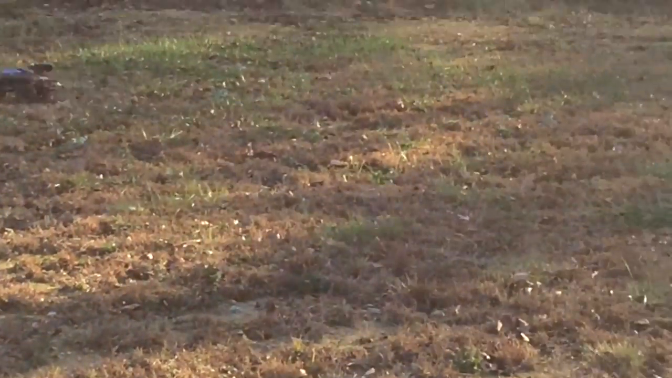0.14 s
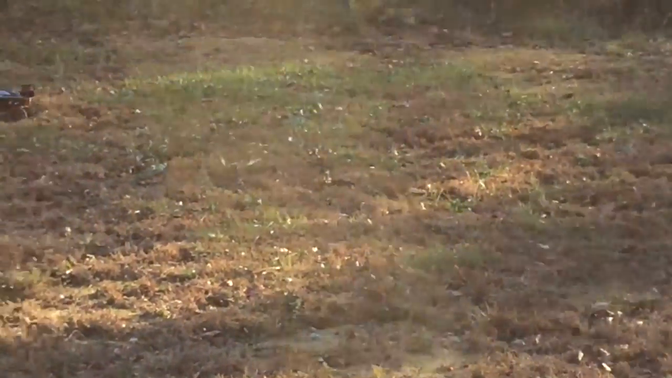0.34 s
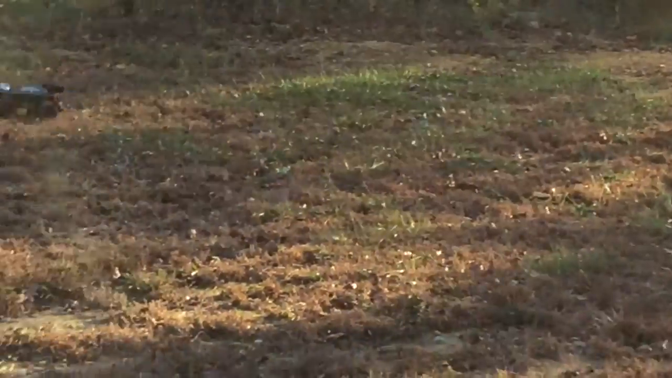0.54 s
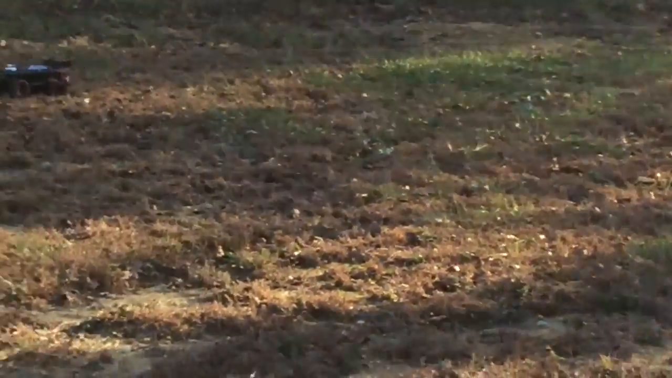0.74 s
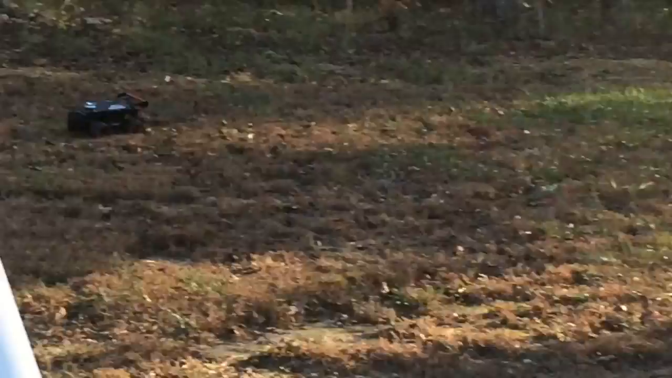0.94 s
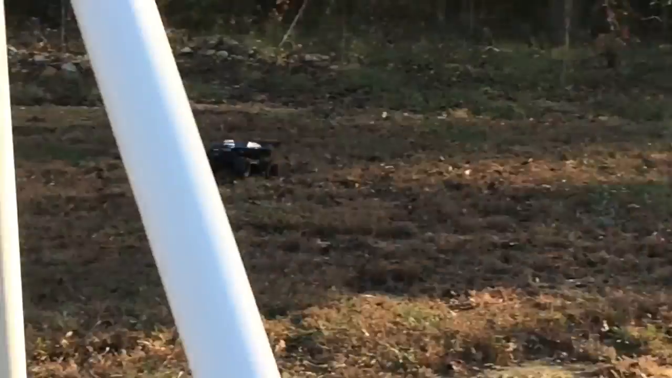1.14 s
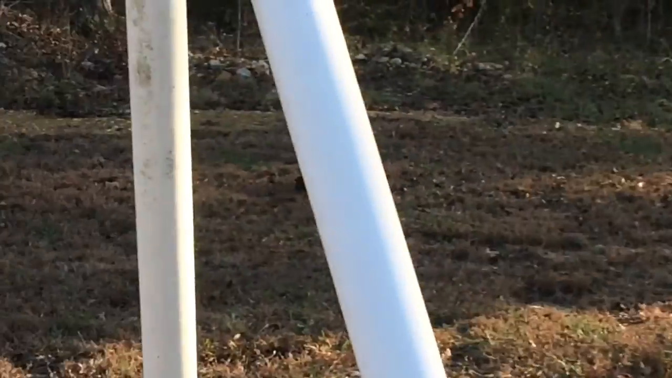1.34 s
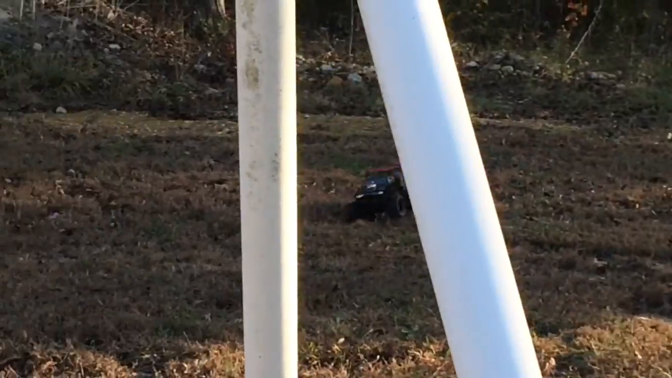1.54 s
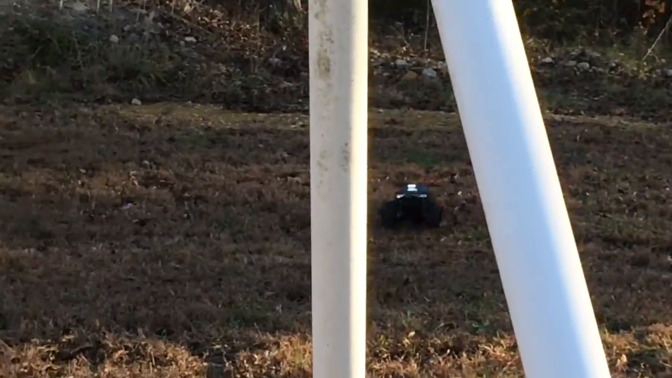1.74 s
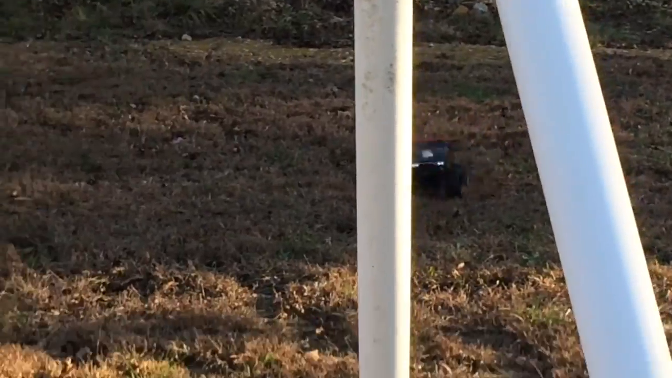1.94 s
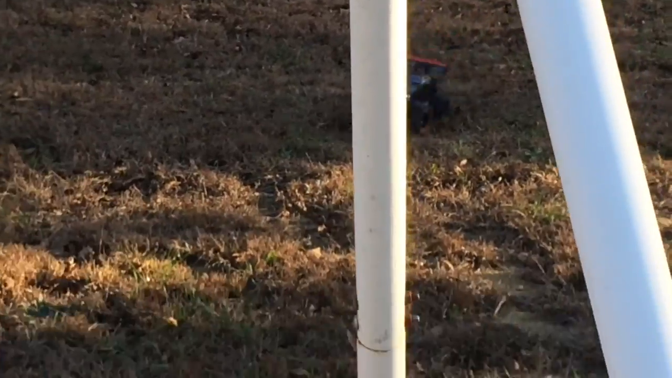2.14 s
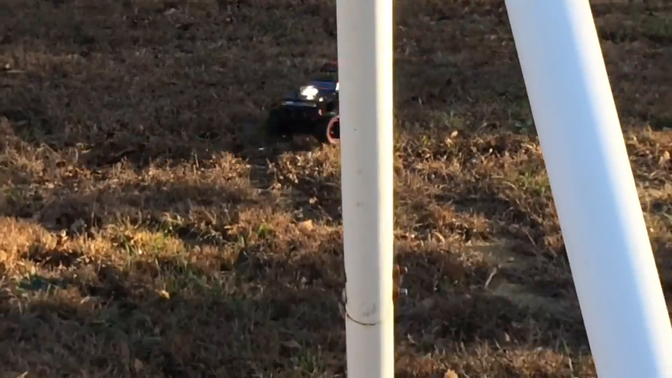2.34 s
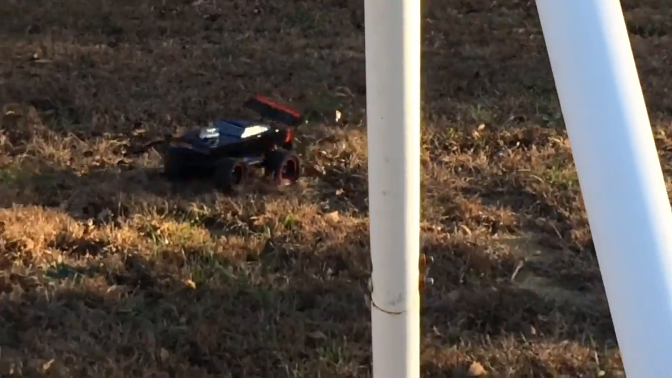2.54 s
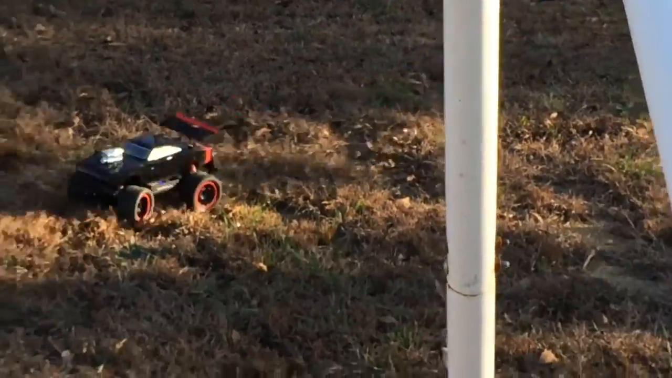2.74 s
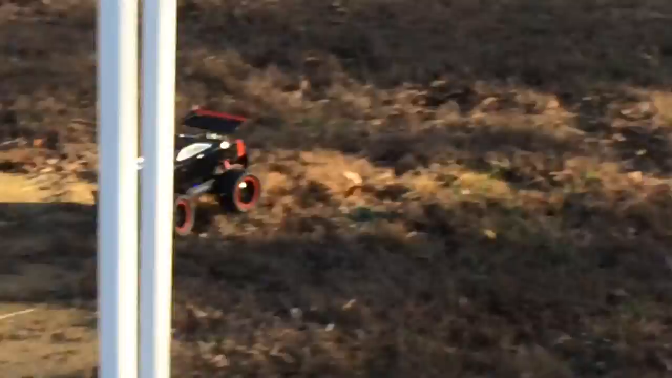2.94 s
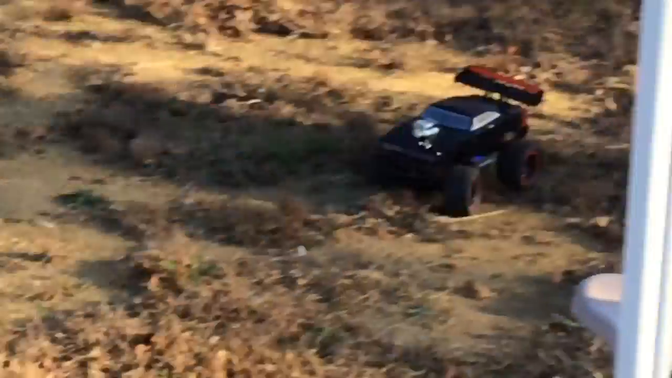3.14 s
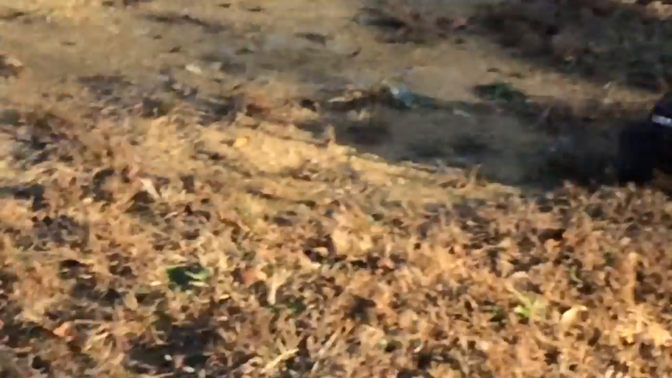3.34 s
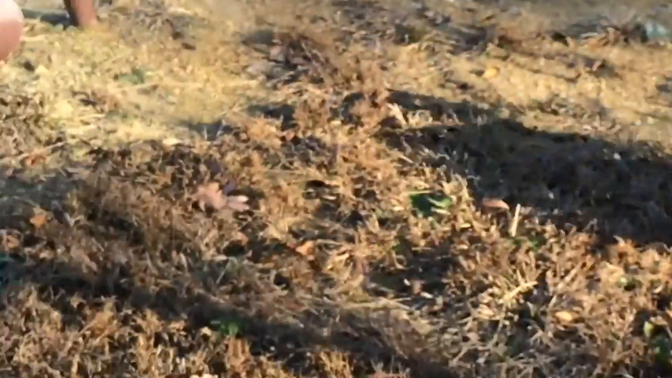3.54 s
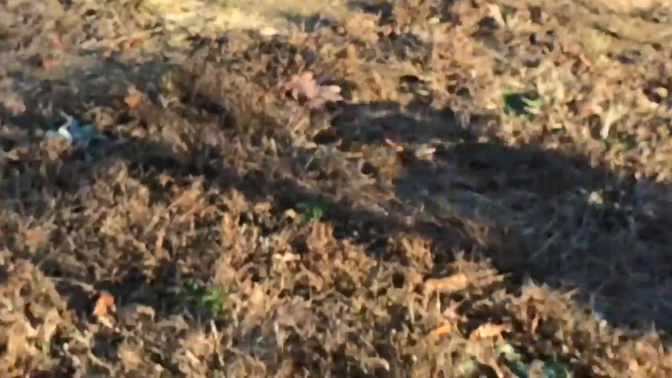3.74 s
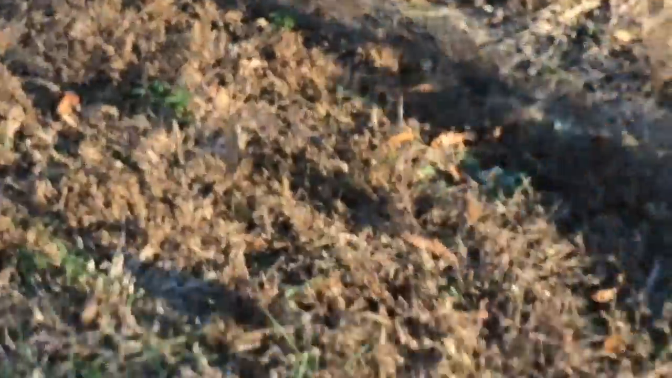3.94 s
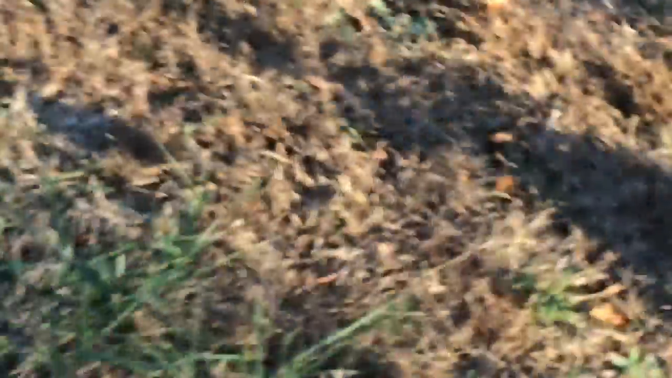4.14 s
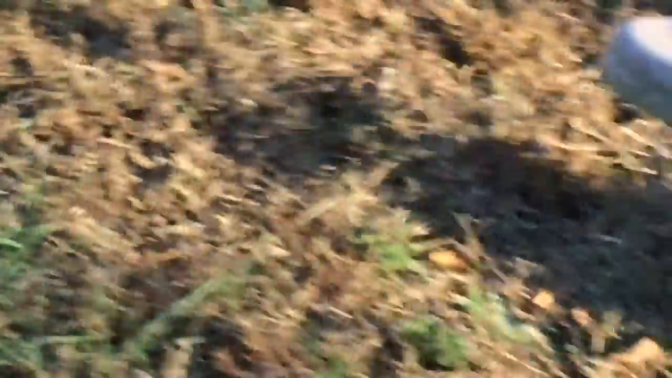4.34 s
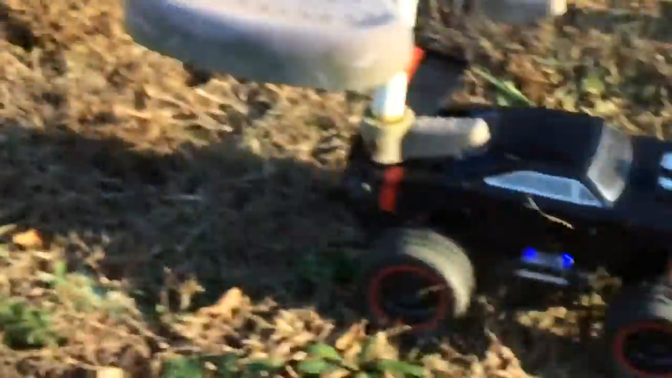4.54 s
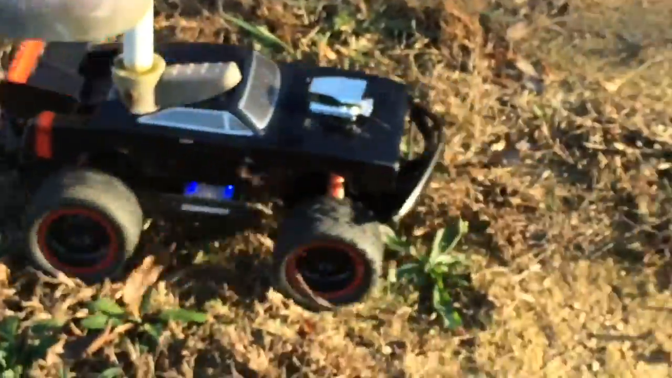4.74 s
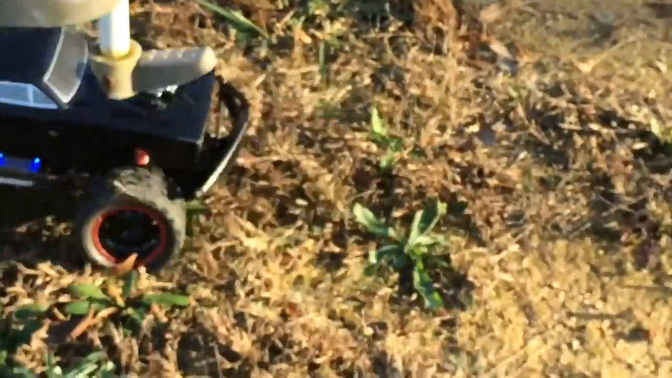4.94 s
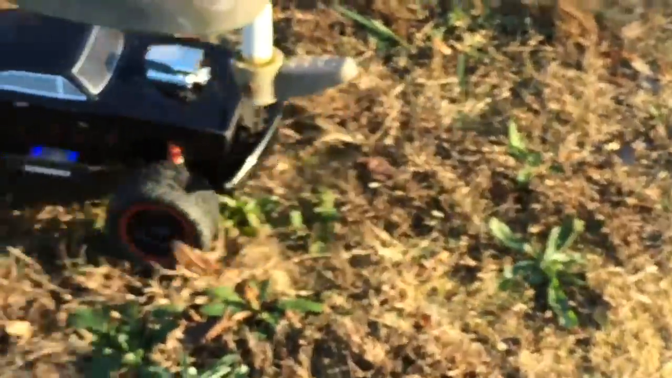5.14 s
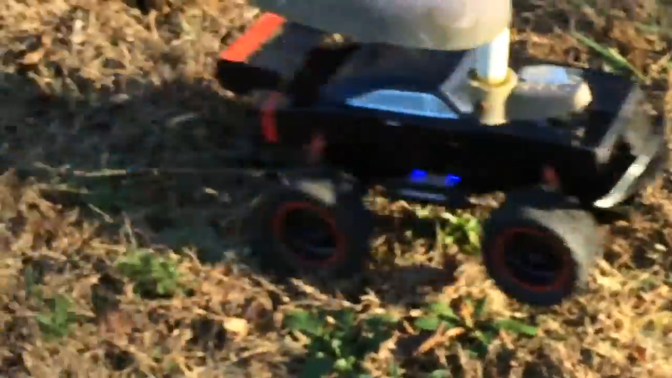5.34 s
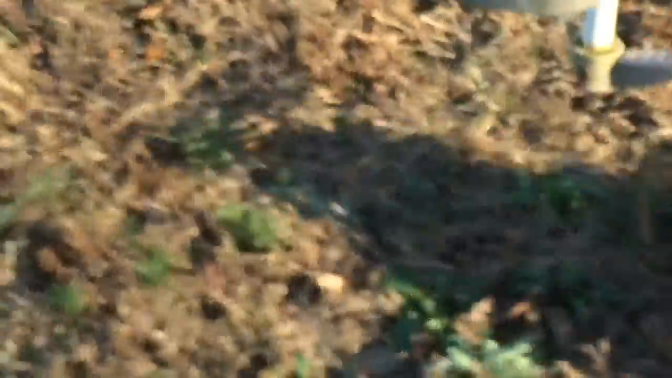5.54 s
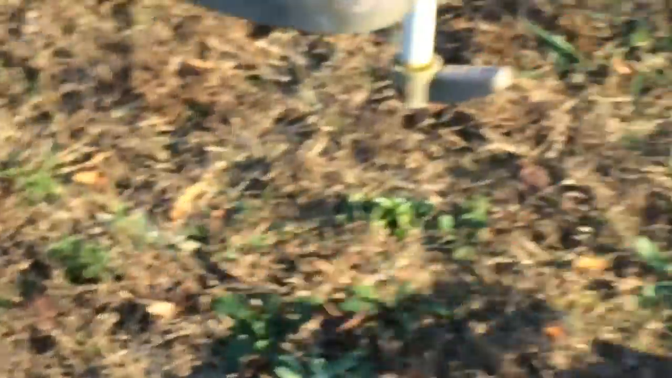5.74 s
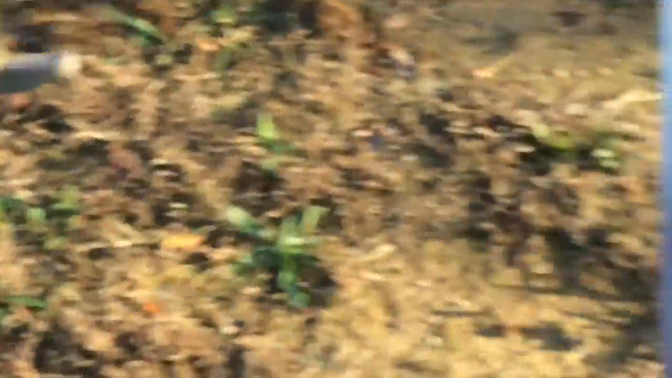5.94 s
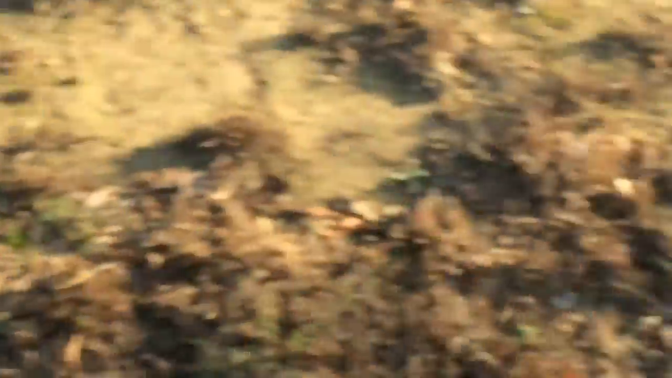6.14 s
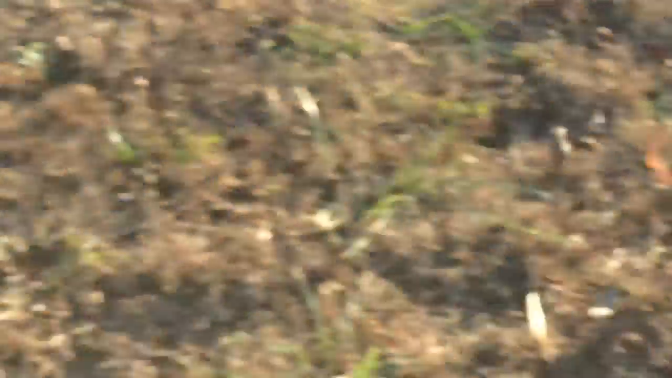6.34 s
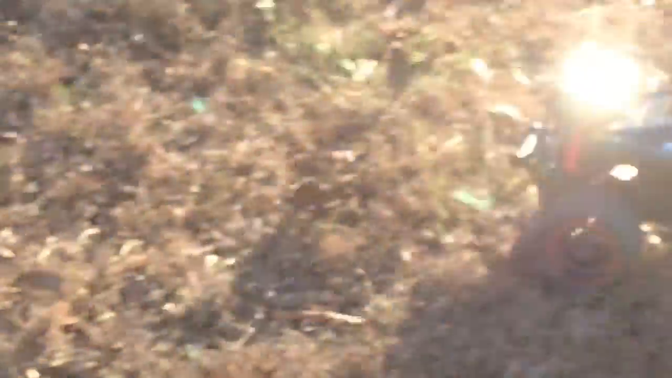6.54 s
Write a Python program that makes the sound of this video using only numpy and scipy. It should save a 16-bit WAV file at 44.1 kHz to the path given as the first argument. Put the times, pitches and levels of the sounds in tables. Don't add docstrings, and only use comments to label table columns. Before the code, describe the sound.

A handheld phone hears a small battery car driving on dry grass. At first there is only weak whine and rustle behind soft yard hush and distant humming. Then come rough bursts: crunching stalks, scraping gears, knocks on the plastic body, dull bumps on the phone. The motor spins up close by, sags under load, cuts off, and surges again harshest and loudest, heaving to the end.

```python
import sys
import numpy as np
from scipy import signal
from scipy.io import wavfile
from scipy.ndimage import uniform_filter1d

SR = 44100
rng = np.random.default_rng(int(sys.argv[2]) if len(sys.argv) > 2 else 0)


def int16_out(signal):
    q = np.round(np.clip(np.atleast_2d(signal).T, -1, 1) * 32767)
    wavfile.write(sys.argv[1], SR, q.astype(np.int16))


def field_ratio(decibels):
    return 10 ** (np.asarray(decibels, dtype=float) / 20)


N = 290178

# f/Hz, density/dB per Hz
YARD_COLOUR = [(24, -33), (40, -1), (86, 1.5), (265, -4.5), (333, -6), (412, -7), (800, -10.5), (1040, -32),
               (1760, -120)]
# t/s, level/dB
YARD_LEVEL = [(0.0, -45), (1.48, -43), (6.58, -47.5)]
# start t/s, end t/s, f/Hz, level/dB
HUMS = [
    (0, 2.15, 155, -46),
    (2.4, 3.2, 155, -51),
    (4.7, 5.45, 135, -47),
    (2.8, 4.2, 75, -51),
    (.9, 1.4, 127, -47),
]
# t/s, peak level/dB
BUMPS = [
    (4.199, -21),
    (4.247, -24.5),
]
# t/s, peak level/dB, ring f/Hz
KNOCKS = [(2.169, -29, 768), (2.774, -21.5, 856), (3.128, -25, 735), (3.239, -29.5, 1095),
          (3.555, -20.5, 966), (4.031, -30.5, 860), (4.084, -18, 790), (4.197, -22.5, 782),
          (4.243, -14, 311), (4.461, -17, 684), (4.633, -22.5, 892), (4.739, -24, 813), (5.735, -28, 843),
          (6.124, -26.5, 1204), (6.537, -33, 870), (6.569, -23, 705)]
# t/s, peak level/dB, ring f/Hz, hiss relative level/dB
JOLTS = [(2.6994, -15.5, 3330, -2.5), (3.1503, -9.5, 3400, -20), (3.2072, -18, 4760, -3),
         (3.2503, -10, 9200, -7), (3.351, -23, 3060, -19), (3.473, -11.5, 3250, -19),
         (3.864, -16.5, 3000, -16), (4.001, -7.5, 4280, -8), (4.0332, -20, 4240, 2.5),
         (4.1184, -19.5, 1860, -4), (4.9569, -24.5, 3750, 5), (5.042, -32, 4430, 6.5),
         (5.1, -25.5, 6660, 3.5), (5.1703, -28, 4320, -6), (5.2799, -12.5, 4500, -26),
         (5.4713, -2.5, 4510, -38), (5.509, -12, 4480, -25), (6.217, -22, 6500, -6),
         (6.5374, -15, 1685, -25)]

# f/Hz, density/dB per Hz
CHASSIS_COLOUR = [(180, -27.5), (300, -1.5), (540, -3.5), (805, 3), (1170, -3), (1700, -5.5), (2210, -71),
                  (3740, -120)]
GRASS_COLOUR = [(3180, -26), (5400, -3), (7470, -4.5), (8390, -4.5), (11300, -6.5), (14000, -7.5),
                (15600, -11.5)]
GRIND_COLOUR = [(760, -48), (1300, -6.5), (2200, -2.5), (2500, -2.5), (3800, -9.5), (4940, -56),
                (8360, -120)]
# f/Hz, width/Hz, level/dB
PINION_MODES = [(8890, 780, 0.5), (10630, 2400, -2)]
AXLE_MODES = [(2640, 330, -3), (3077, 1060, 3)]
HOUSING_MODES = [(4060, 1230, 5), (4402, 560, 4), (4894, 300, 4.5)]

# t/s, work at the wheels level/dB, shell turned toward the phone level/dB
WORK = [(0.0, -41.5, 6), (0.72, -39.5, 2), (1.5, -40, 0.5), (1.68, -42.5, -1), (2.01, -38.5, 3),
        (2.27, -42, -7.5), (2.6, -36, 1.5), (3.07, -35, 0), (3.45, -29.5, -10.5), (3.742, -29, -4),
        (3.762, -38.5, -5), (4.3, -47.5, -11.5), (4.34, -31.5, -7.5), (4.89, -31.5, -0.5),
        (5.012, -44, -1.5), (5.3, -44.5, 7), (5.41, -28.5, 10), (6.14, -27, -1)]
# t/s, swell level/dB, half length/s, thump under the chassis level/dB
BOUNCES = [(0.41, 3.5, 0.012, 8), (2.378, 4.5, 0.053, 6), (2.683, 1, 0.048, 12), (2.766, 3, 0.055, 6.5),
           (2.96, 5.5, 0.063, 3.5), (3.153, 3.5, 0.056, 12.5), (3.261, 5, 0.012, -3),
           (3.332, -6, 0.024, 8.5), (3.463, -19, 0.011, -3), (3.553, -1.5, 0.018, 8),
           (3.61, -4, 0.078, -3.5), (3.89, 7.5, 0.12, 0.5), (4.017, 9.5, 0.1, 3.5), (4.091, 4, 0.017, 19),
           (4.238, 15.5, 0.14, 14), (3.223, -1.5, 0.047, -4), (5.108, 6.5, 0.041, 3.5),
           (5.236, -11, 0.019, -1), (5.277, 12.5, 0.084, 15.5), (5.489, -6.5, 0.068, 2),
           (5.564, 5.5, 0.017, 6), (5.608, -3.5, 0.084, 2), (5.756, -2.5, 0.024, 7.5),
           (5.807, 2, 0.047, 4.5), (5.848, -6, 0.03, -3.5), (6.132, 6.5, 0.016, 5.5), (6.28, 13, 0.018, -4),
           (6.388, 6.5, 0.084, 3.2), (6.538, 7.5, 0.035, 15), (6.58, 8.5, .04, 10)]
# level/dB when work is -35 dB, share of work, share of facing, share of swell
RING_FOLLOWS = (-38, 1.28, 0.82, 1.36)
GRIND_FOLLOWS = (-36, 1.0168, 0.0158, 0.92)
HISS_FOLLOWS = (-35, 1.034, 0.06, 0.79)
RUMBLE_FOLLOWS = (-40, 0.6053, -0.33, 0.06)

# t/s, free gear mesh f/Hz, whine level/dB
RUNS = [
    [(0.0, 2280, -33), (0.09, 2180, -38), (0.15, 2700, -40), (0.19, 2700, -57), (1.1, 2700, -57),
     (1.7, 2700, -57)],
    [(1.8, 2950, -56), (1.84, 2470, -40.5), (1.89, 2640, -40), (2.0, 2840, -41), (2.06, 2830, -40),
     (2.085, 2650, -39), (2.13, 2130, -50)],
    [(2.79, 3170, -34), (2.89, 3490, -46), (2.94, 2480, -49.5), (3.03, 2180, -38), (3.06, 2200, -65),
     (3.6, 2870, -58), (3.63, 2900, -35), (3.74, 2770, -26), (3.755, 2550, -53)],
    [(4.29, 829, -35), (4.32, 1245, -32.5), (4.35, 1884, -35), (4.38, 2320, -28.5), (4.41, 2531, -21.5),
     (4.65, 2578, -28.5), (4.86, 2474, -24), (4.9, 1924, -43), (4.94, 1300, -33)],
]
# t/s, free gear mesh f/Hz, whine level/dB
LAST_RUNS = [
    [(5.32, 876, -36), (5.37, 1390, -21.5), (5.415, 1905, -17), (5.465, 1777, -12.5), (5.555, 2274, -15.5),
     (5.635, 2115, -17), (5.69, 2340, -21.5), (5.74, 2910, -22.5), (5.79, 2900, -19)],
    [(5.79, 2895, -30), (5.84, 2800, -25), (5.88, 2950, -17), (5.93, 2910, -26), (5.96, 2500, -21.5),
     (6.0, 2503, -16), (6.06, 2680, -25.5), (6.11, 3075, -13.5), (6.15, 2850, -38)],
]
# slowest t/s, sag f/Hz, fall t/s, strain
# level/dB
BITES = [(0.024, 420, .021, 1.5), (0.248, 380, .03, 17), (0.289, 480, .022, 25), (0.598, 580, .035, 22),
         (1.029, 480, .028, 24), (1.19, 640, .036, 24), (1.376, 450, .025, 24), (1.58, 760, .024, 25),
         (2.973, 336, .025, 18), (4.441, 275.5, .016, -5), (4.478, 600, 0.024, 1.5),
              (4.508, 330, 0.026, -1.5), (4.596, 462, 0.036, 5.5), (4.689, 272, 0.036, 4),
              (4.77, 221.3, .045, 4), (5.497, 870, 0.029, -11), (5.59, 690, 0.026, -3.5),
              (5.66, 231, .022, -0.5), (5.76, 1173, .022, 4.5), (5.801, 550, 0.021, -5),
              (5.909, 248.3, .03, 0), (5.957, 329, .018, 1), (6.014, 600, 0.032, 1.5)]
# f/Hz, level/dB
SHELL = [(900, -19), (1800, -8), (2120, -14), (2420, -6.5), (2950, -7), (3400, -9.5), (4300, 2.7),
         (5200, -8.5)]
ORDERS_DB = (0, 0, -3, -13, -12)

STOP_S, STOP_DB, STOP_FACING_DB = 0.042, -38.5, -2.5
GROUND_CLEAR_S, GROUND_FADE_S = 1.73, 0.61
GROUND_DIP_DB = -6.5
GROUND_TOP_HZ, GROUND_WHINE_DB = 2850, -10.5
REGAIN = 1.7
STRAIN_LEAD = 0.57
LASH_DB_PER_KHZ, LASH_AFTER_S, LASH_S = -14, .012, .014
WHINE_BOUNCE = .6
TURNED_SHARE = -0.5
STEP_S = .002


def evened(x):
    return x / np.sqrt(np.mean(x ** 2) + 1e-20)


def add(mix, s, sound):
    part = mix[round(s * SR):][:len(sound)]
    part += sound[:len(part)]


def smoothed(x, span):
    return uniform_filter1d(uniform_filter1d(x, span), span)


def wander(seconds, length=N):
    return evened(smoothed(rng.standard_normal(length), max(int(seconds * SR), 2)))


def hump(t, s, fall, rise):
    u = np.where(t < s, (s - t) / fall, (t - s) / rise)
    return np.cos(np.pi / 2 * np.minimum(u, 1)) ** 2


def colour_db(points, hz):
    f, value = np.transpose(points)
    return np.interp(np.log(hz + 1), np.log(f + 1), value, left=-90, right=-90)


def rings_db(modes, hz):
    power = sum(field_ratio(db) ** 2 / (1 + (2 * (hz - f_hz) / width) ** 2) ** 2 for f_hz, width, db in modes)
    return 10 * np.log10(power + 1e-9)


def noise(shape_db, points, patchy_db, size=256):
    hz = np.fft.rfftfreq(size, 1 / SR)
    a, b, patches = rng.standard_normal((2 * N // size + 5, len(hz), 3)).T
    patches = uniform_filter1d(patches, size=7, axis=1)
    patches = evened(uniform_filter1d(patches, size=3, axis=0))
    z = (a + 1j * b) * field_ratio(shape_db(points, hz)[:, None] + patchy_db * patches)
    return evened(signal.istft(z, window="cosine", nperseg=size)[1][:N])


def crackle(per_s, spread_db, seconds):
    strength = field_ratio(spread_db * np.minimum(rng.exponential(1, N), 5))
    events = strength * (rng.random(N) < per_s / SR)
    span = max(int(seconds * SR), 2)
    return np.sqrt(1 + span * np.abs(smoothed(events, span)))


def yard():
    t = np.arange(N) / SR
    hush_db = np.interp(t, *np.transpose(YARD_LEVEL)) + 0.5
    out = field_ratio(hush_db) * noise(colour_db, YARD_COLOUR, 2.2, size=2048)
    for start, end, hz, db in HUMS:
        on = np.clip(np.minimum(t - start, end - t) / 0.34 + .5, 0, 1)
        level = field_ratio(db + 2.5 * wander(.1))
        turns = np.cumsum(hz + 1.2 * wander(.2)) / SR
        out += on * level * np.cos(2 * np.pi * turns)
    return out


def phone_bumps():
    out, t = np.zeros(N), np.arange(3000) / SR
    for s, db in BUMPS:
        push = np.sin(2 * np.pi * 190 * t * np.exp(-t / 0.025))
        add(out, s, field_ratio(db + 4.0) * push * field_ratio(-60 * t / 0.03))
    return out


def knocks():
    out, t = np.zeros(N), np.arange(3000) / SR
    chance = rng.standard_normal((len(KNOCKS), len(t)))
    for (s, db, hz), rattle in zip(KNOCKS, chance):
        modes = sum(a * np.sin(2 * np.pi * ratio * hz * t) for a, ratio in ((1, 1), (.45, 1.2), (.28, .74)))
        envelope = field_ratio(db - 60 * t / .075) * (1 - np.exp(-t / .001))
        add(out, s, envelope * modes * (1 + .4 * evened(uniform_filter1d(rattle, 60))))
    return out


def jolts():
    out, t = np.zeros(N), np.arange(1500) / SR
    chance = rng.standard_normal((len(JOLTS), 2, len(t)))
    swell = t / .0025 * np.exp(1 - t / .0025)
    for (s, db, hz, hiss_db), (crunch, rasp) in zip(JOLTS, chance):
        ring = np.cos(2 * np.pi * hz * t * (1.03 - 6. * t))
        ring = ring * (.5 + .6 * evened(uniform_filter1d(rasp, 30)))
        hiss = field_ratio(hiss_db) * uniform_filter1d(crunch, size=2)
        add(out, s - .002, field_ratio(db) * swell * (.5 * ring + .5 * hiss))
    return out


def far_off(t):
    return np.clip((GROUND_CLEAR_S - t) / GROUND_FADE_S, 0, 1)


def bouncing(t):
    return sum(np.outer([db, thump_db], hump(t, s, half, half)) for s, db, half, thump_db in BOUNCES)


def layer_levels():
    t = np.arange(0, N / SR + STEP_S, STEP_S)
    s, work_db, facing_db = np.transpose(WORK + [(WORK[-1][0] + STOP_S, STOP_DB, STOP_FACING_DB)])
    swell, thump = bouncing(t)
    controls = np.array([t ** 0, np.interp(t, s, work_db) + 35, np.interp(t, s, facing_db), swell])
    levels = np.array([RING_FOLLOWS, GRIND_FOLLOWS, HISS_FOLLOWS, RUMBLE_FOLLOWS]) @ controls
    levels[1] += GROUND_DIP_DB * far_off(t)
    levels[3] += thump
    return [np.interp(np.arange(N) / SR, t, level) for level in levels]


def chassis_rumble(rumble_db, heave):
    return field_ratio(rumble_db - 2.5 + 0.89 * heave) * noise(colour_db, CHASSIS_COLOUR, 3.2, size=512)


def grass_hiss(ring_db, grind_db, hiss_db, heave, stalks):
    pinion_db = 0.52 * (hiss_db + 26.0) + 0.42 * (ring_db - grind_db)
    hiss = noise(colour_db, GRASS_COLOUR, 1.36)
    hiss += field_ratio(pinion_db) * noise(rings_db, PINION_MODES, 5.)
    return field_ratio(hiss_db - 2.0 + 1.5 * heave) * hiss * evened(stalks ** 0.97)


def gear_grind(ring_db, grind_db, heave, stalks):
    rasp_db = np.clip(.9 * (grind_db - ring_db) - 3., -20, 6)
    rasp = evened(crackle(70, 5., .005) * noise(rings_db, AXLE_MODES, 5, size=512))
    grind = noise(colour_db, GRIND_COLOUR, 3.2, size=512) + field_ratio(rasp_db) * rasp
    return field_ratio(grind_db - 5.0 + 0.74 * heave) * grind * evened(stalks ** 0.5)


def shell_ring(ring_db, heave, stalks):
    ring = evened(stalks ** .6 * noise(rings_db, HOUSING_MODES, 3.2, size=512))
    return field_ratio(ring_db - .4 + 1.8 * heave) * ring


def drive():
    ring_db, grind_db, hiss_db, rumble_db = layer_levels()
    heave, stalks = wander(0.0096), crackle(120, 1.9, 0.0011)
    return (chassis_rumble(rumble_db, heave)
            + grass_hiss(ring_db, grind_db, hiss_db, heave, stalks)
            + gear_grind(ring_db, grind_db, heave, stalks)
            + shell_ring(ring_db, heave, stalks))


def motor_rows(run):
    s, free_hz, db = np.transpose(run)
    t = np.arange(s[0], s[-1], STEP_S)
    hz = np.interp(t, s, free_hz)
    level = np.interp(t, s, db) + WHINE_BOUNCE * bouncing(t)[0]
    for at, sag_hz, fall, strain_db in BITES:
        hz = hz - sag_hz * hump(t, at, fall, REGAIN * fall)
        level = level + strain_db * hump(t, at - STRAIN_LEAD * fall, fall, REGAIN * fall)
        lash_db = LASH_DB_PER_KHZ * sag_hz / 1000
        level = level + lash_db * hump(t, at + LASH_AFTER_S, LASH_S, LASH_S)
    f, shell_db = np.transpose(SHELL)
    parts = [level + order_db + np.interp(np.log(k * hz), np.log(f), shell_db)
             for k, order_db in enumerate(ORDERS_DB, 1)]
    low_pitch = np.clip((GROUND_TOP_HZ - hz) / 300, 0, 1)
    facing_db = np.interp(t, *np.transpose(WORK)[::2])
    parts[0] = parts[0] + GROUND_WHINE_DB * far_off(t) * low_pitch + TURNED_SHARE * facing_db
    return np.transpose([t, hz, *parts])


def whine(rows):
    s, *columns = np.transpose(rows)
    t = np.arange(s[0] - .004, s[-1] + .004, 1 / SR)
    hz, *levels_db = (uniform_filter1d(np.interp(t, s, c), 200) for c in columns)
    tone = np.zeros(len(t))
    for axle_db, slip in ((0, 1), (-15, .88 + .03 * wander(.02, len(t)))):
        turns = np.cumsum(hz * slip * (1 + .011 * wander(.002, len(t)))) / SR
        grip = field_ratio(2.5 * np.minimum(wander(.015, len(t)), .7))
        wobble = grip * (1 + .3 * np.cos(2 * np.pi * turns / 9))
        for k, (db, flutter_db) in enumerate(zip(levels_db, (5, 3, 3.5, 5, 5)), 1):
            dead_db = -14 * np.clip(np.minimum(k * hz - 5150, 8300 - k * hz) / 350, 0, 1)
            flutter = flutter_db * np.minimum(wander(.005, len(t)), 1)
            gain = field_ratio(db + axle_db + dead_db + flutter)
            tone += gain * wobble * np.sqrt(2) * np.cos(2 * np.pi * k * turns)
    edge = np.minimum(np.minimum(t - t[0], t[-1] - t) / .008, 1)
    return max(t[0], 0), tone * edge


def motor():
    out = np.zeros(N)
    for run in RUNS + LAST_RUNS:
        add(out, *whine(motor_rows(run)))
    return out


def scene():
    return np.tile(yard() + phone_bumps() + knocks() + jolts() + drive() + motor(), (2, 1))


def top_cut(x):
    return signal.sosfilt(signal.butter(12, 15800, fs=SR, output="sos"), x)


def record(dry):
    low_cut = signal.butter(3, 42, "high", fs=SR, output="sos")
    band = signal.sosfilt(low_cut, .8 * np.tanh(dry / .8))
    return top_cut(band)


dry = scene()
out = record(dry)
int16_out(out)
```